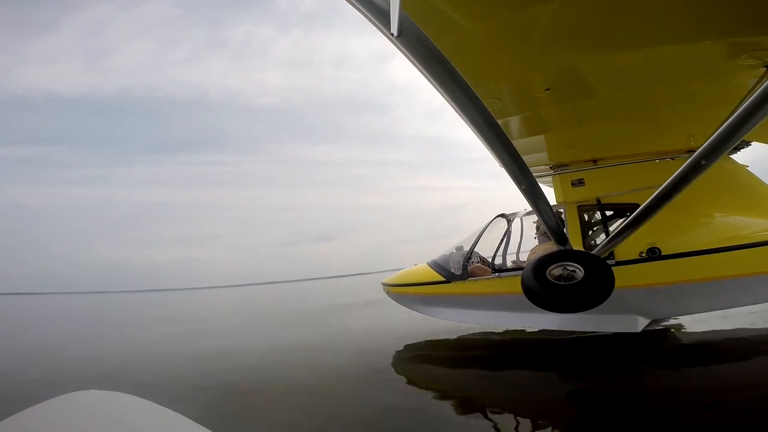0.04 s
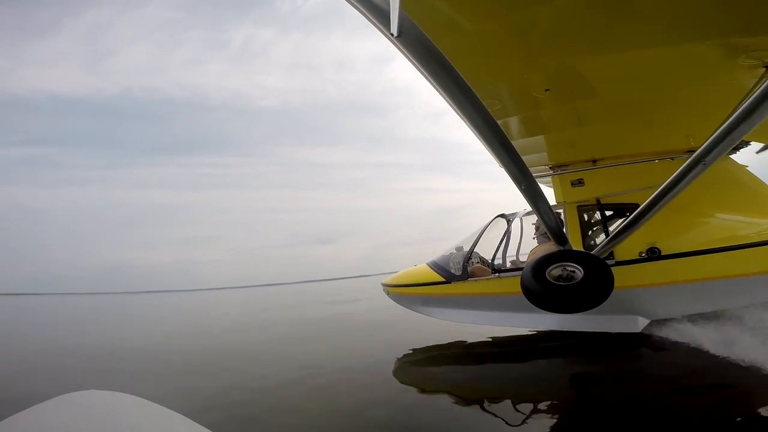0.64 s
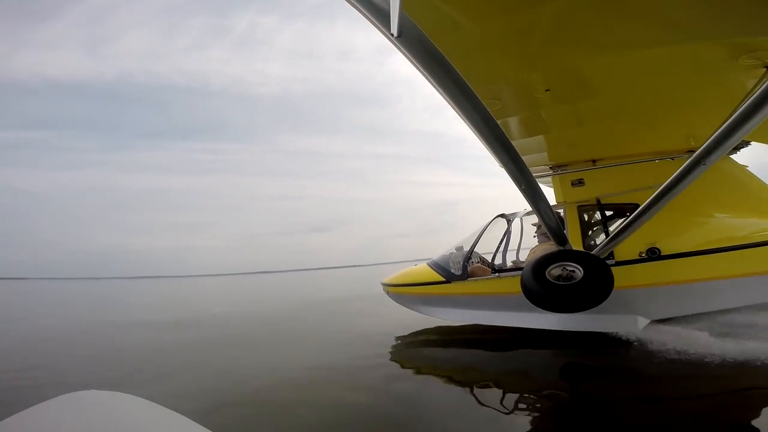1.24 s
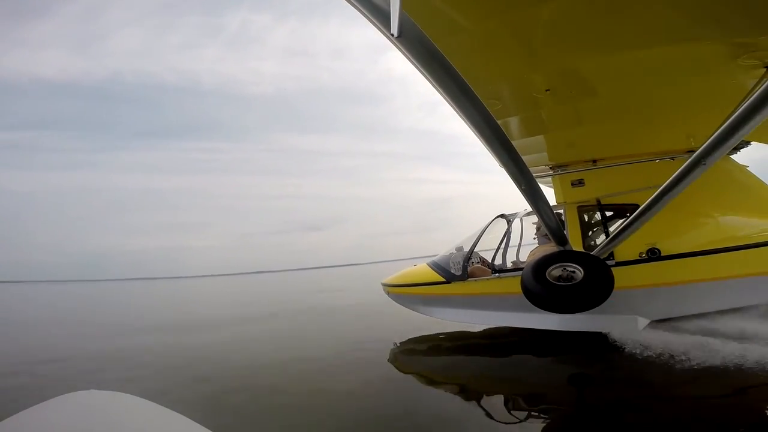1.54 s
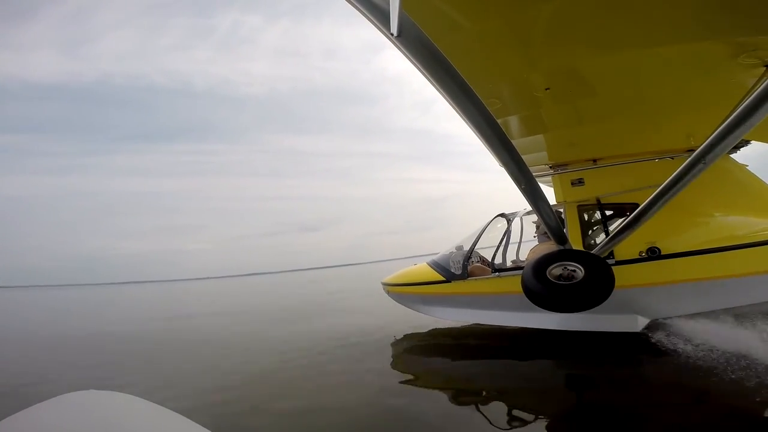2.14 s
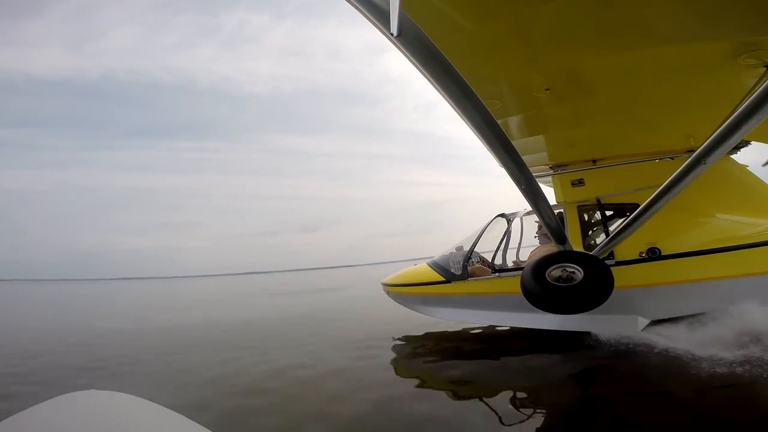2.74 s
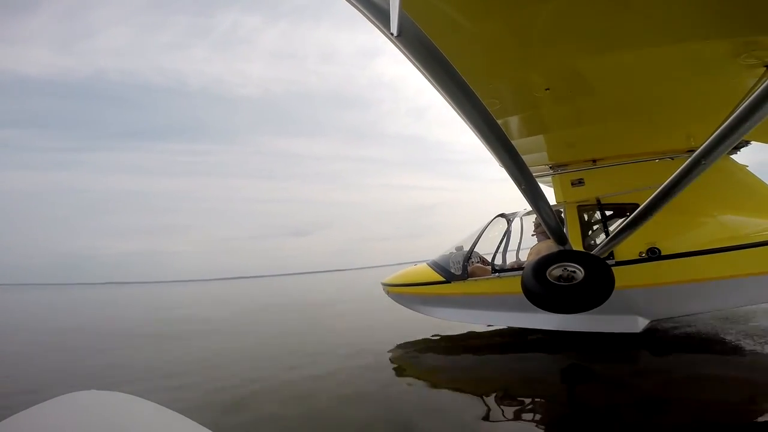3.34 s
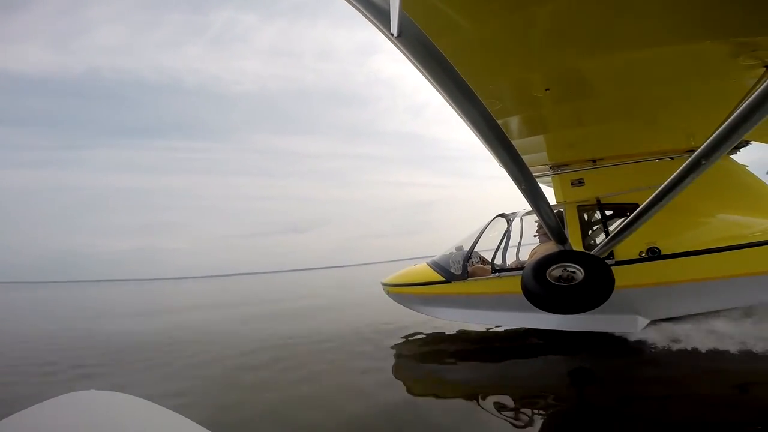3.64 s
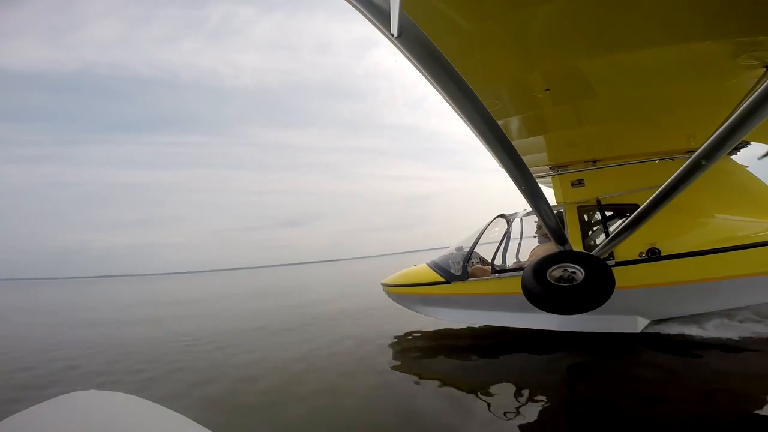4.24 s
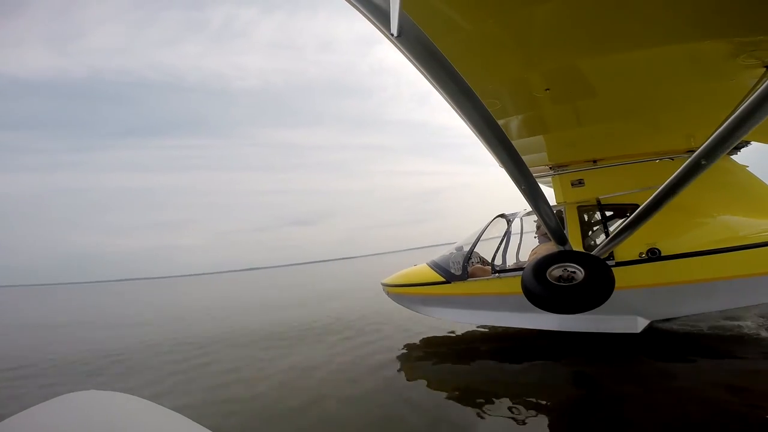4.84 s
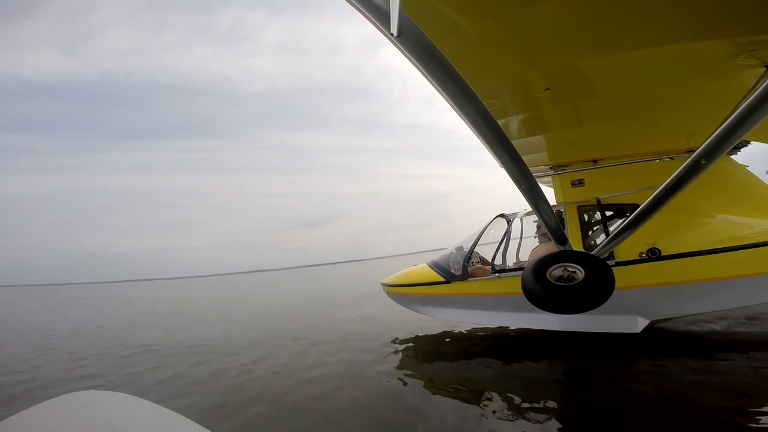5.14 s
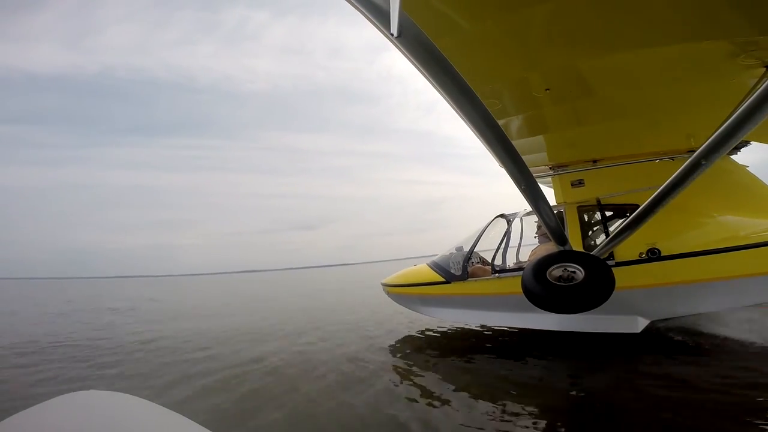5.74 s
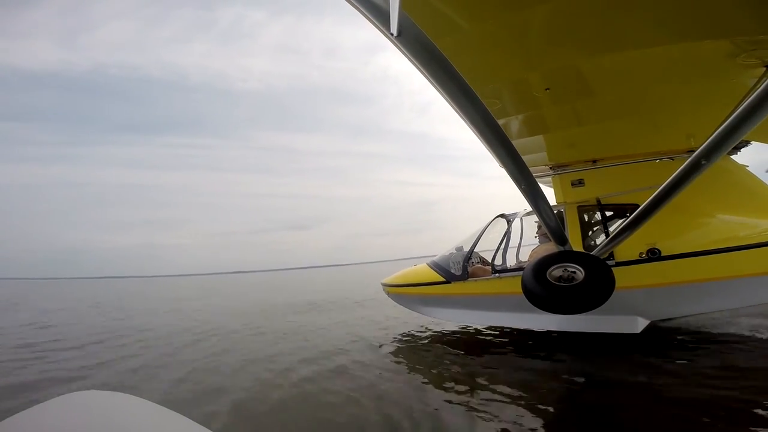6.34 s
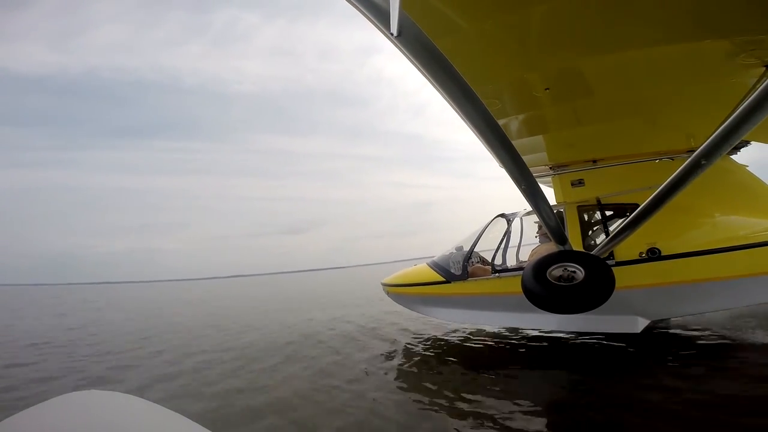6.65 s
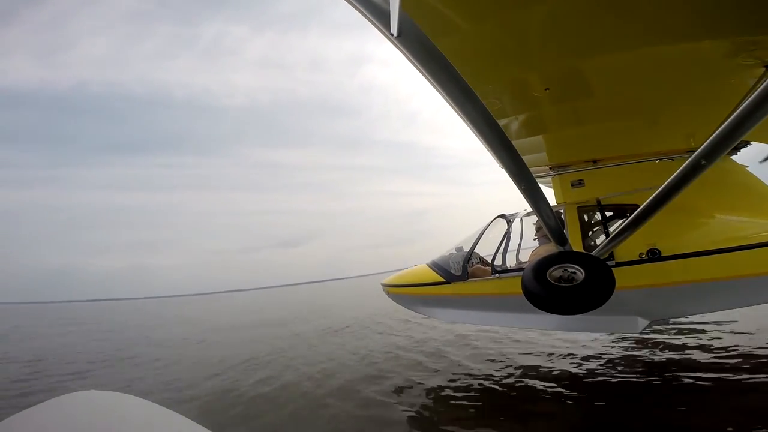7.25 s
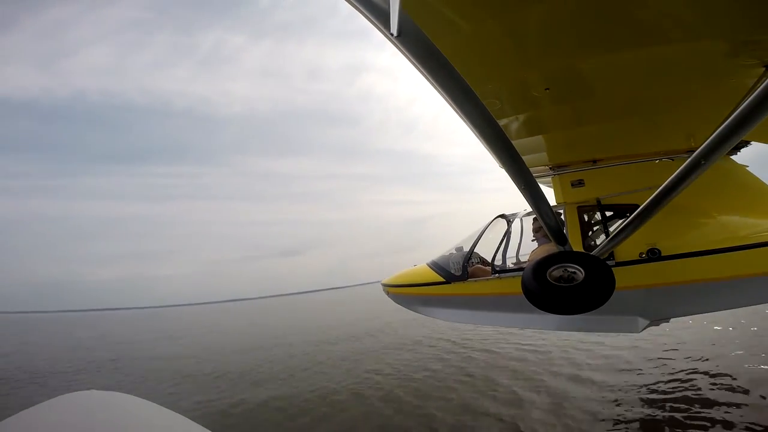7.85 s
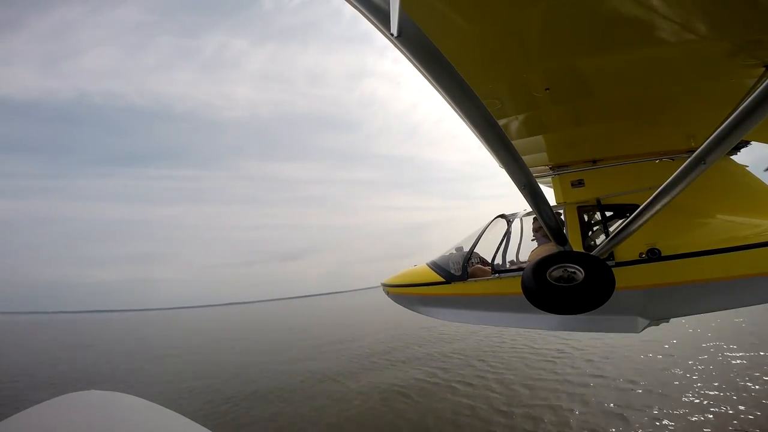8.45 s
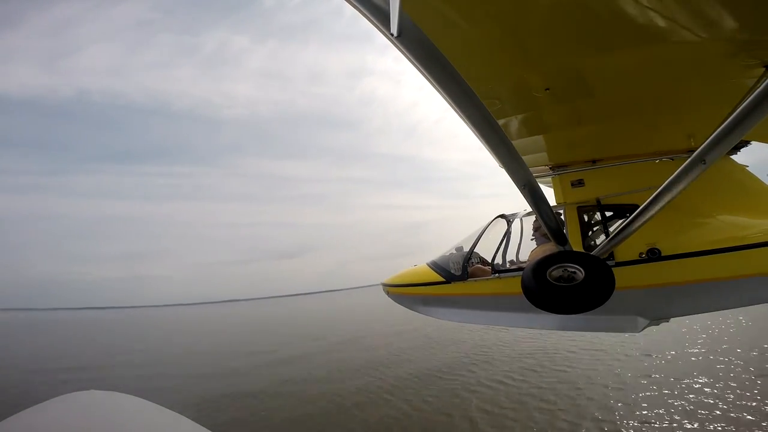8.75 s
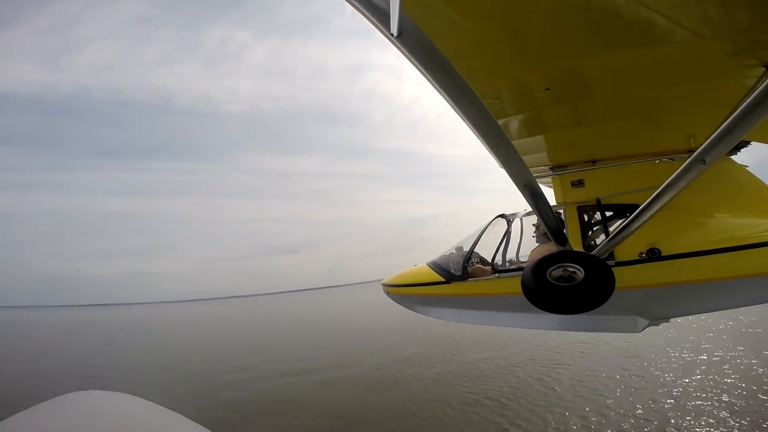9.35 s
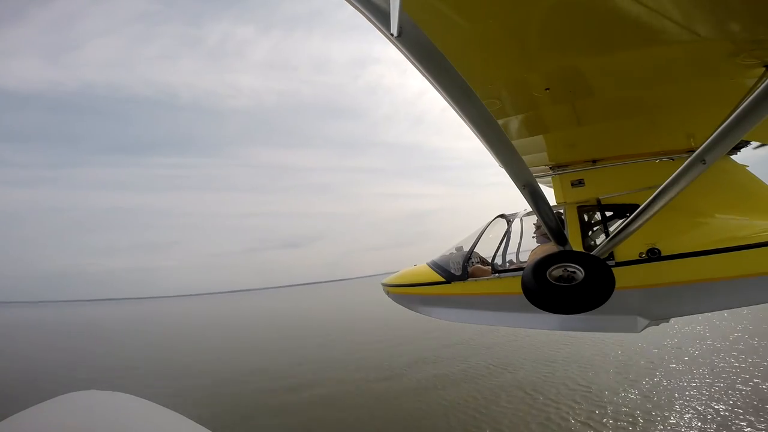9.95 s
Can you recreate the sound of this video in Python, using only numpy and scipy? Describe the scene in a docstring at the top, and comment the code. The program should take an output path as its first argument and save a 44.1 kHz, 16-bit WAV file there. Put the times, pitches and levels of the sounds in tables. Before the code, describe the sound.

A light seaplane's engine and propeller growl and climb in pitch, then hold a loud, booming drone as it skims calm water and lifts off, sagging slightly near the end. Wind buffets the wing, and a low howl swells on and off from about halfway. Air and spray hiss throughout, with faint rattles from the mount. The microphone rides on the wing, close to the engine.

```python
"""Seaplane take-off from the wing

Calm water; the microphone rides in a camera case on the wing of a light seaplane that opens its
throttle, skims and lifts off. Close by, a four-stroke engine turns a three-blade propeller through a
whining gearbox, and the low orders boom in the wing. Wind shakes the wing and a narrow resonance
howls. Right at the microphone, spray and air hiss through the case and ripples rattle its mount."""
import sys
import numpy as np
from scipy import signal
from scipy.fft import rfft, irfft, next_fast_len
from scipy.io import wavfile
from scipy.ndimage import map_coordinates

SR = 44100
rng = np.random.default_rng(int(sys.argv[2]) if len(sys.argv) > 2 else 0)


def generate_wav(sig):
    """Save sig (samples, or channels by samples) to the path in sys.argv[1] as 16-bit PCM at SR."""
    pcm = np.round(np.clip(np.atleast_2d(sig).T, -1, 1) * 32767).astype(np.int16)
    wavfile.write(sys.argv[1], SR, pcm)


N = 440559
BLADES, PINION_TEETH, WHEEL_TEETH = 3, 21, 51
BLADE_PASSES_PER_TURN = BLADES * PINION_TEETH / WHEEL_TEETH  # per turn of the crank
# how the wing carries engine and propeller to the microphone: f/Hz, gain/dB
WING_RESPONSE = [(40, -3), (62, 3), (76, 17.5), (86, 13.5), (98, 10), (113, 4), (124, 2.5), (160, -5.5),
                 (180, -4), (199, -4.5), (220, -8.5), (268, -11), (305, 7), (350, -3.5), (400, -0.5),
                 (800, -2.5), (850, 5), (915, 3.5), (965, -0.5)]


def propeller(blade_phase, rpm, full_rpm=5280, rasp_db_per_octave=28):
    """A strong blade tone, and overtones that grow with tip speed and boom in the wing."""
    # blade-passing tone at the wing: t/s, relative level/dB
    thrum_levels = [(0, -36), (.6, -23), (1.2, -35), (1.4, -13), (1.7, -9.5), (2.1, -10.5), (2.4, -22.5),
                    (2.7, -25.5), (2.9, -13), (3.7, -13), (3.9, -20.5), (4.4, -18.5), (5.1, -26),
                    (6.2, -23), (6.8, -18), (7.8, -21), (8.2, -15.5), (9.99, -18)]
    # overtones at full speed, before the wing colours them: multiple of the blade rate, level/dB
    overtones = [(2, -27.5), (3, -43.5), (4, -59), (5, -55.5), (6, -53), (7, -57.5), (8, -61), (9, -52),
                 (10, -47.5), (11, -60), (13, -45), (14, -53), (15, -48), (17, -49)]
    thrum_db, = curves(thrum_levels)
    blade_hz = rpm / 60 * BLADE_PASSES_PER_TURN
    tip_speed_db = rasp_db_per_octave * np.log2(rpm / full_rpm)
    thrum = amp(thrum_db + 0.56) * tone(blade_phase, flutter_db=1.1, drift_rad=0.034, rate=10)
    rasp = np.zeros(N)
    for order, db in overtones:
        level_db = db + along(WING_RESPONSE, order * blade_hz)
        rasp += amp(level_db) * tone(order * blade_phase, flutter_db=3.0, drift_rad=0.54, rate=14)
    return thrum + amp(tip_speed_db) * rasp


def engine(crank_phase, rpm):
    """A firing tone, and whole and half orders that swell as they cross the wing's resonances."""
    # firing tone, twice per turn of the crank: t/s, level/dB
    firing = [(0, -24), (.25, -27), (.37, -12), (.6, -14.5), (1.1, -14), (1.35, -27), (2.2, -30.5),
              (2.65, -21.5), (2.9, -31.5), (7.5, -21), (9.99, -36)]
    # exhaust and block, before the wing colours them: multiple of the crank rate, level/dB
    orders = [(1, -43), (1.5, -36), (2.5, -34.5), (3, -41.5), (3.5, -32.5), (4, -40), (4.5, -41.5),
              (5, -50.5), (5.5, -50.5), (6, -44), (7.5, -51), (8, -51), (9, -54), (10.5, -60), (11, -53),
              (13, -53), (14.5, -55.5), (15.5, -49.5)]
    # low growl as the engine labours to gain speed: t/s, gain/dB
    growl = [(0, 1.5), (.8, 3.5), (1.4, 0), (2.6, 2), (4.1, 1.5), (5.5, -2), (7, -7), (9.99, -.5)]
    # load, heard in the upper orders: t/s, gain/dB
    load = [(0, -11), (2.3, -10), (3.1, 0.5), (4.2, 1), (7.3, -3), (8.6, -0.5), (9.99, -1)]
    firing_db, = curves(firing)
    growl_db, = curves(growl)
    load_db, = curves(load)
    sound = amp(firing_db) * tone(2 * crank_phase, flutter_db=2.0, drift_rad=0.074, rate=12)
    for order, db in orders:
        effort_db = load_db if order > 3 else growl_db
        level_db = db + effort_db + along(WING_RESPONSE, order * rpm / 60)
        # uneven firing shifts the phase in proportion to the order
        partial = tone(order * crank_phase, flutter_db=1.75, drift_rad=0.051 * order, rate=18)
        sound += amp(level_db) * partial
    return sound


def resonant_howl(start_hz=176.8, rise_hz_per_s=0.98, wander_hz=2, steady_db=-12):
    """A narrow resonance of the wing or mount howls in irregular swells, creeping up in pitch."""
    howl_db = howl_envelope()
    centre_hz = start_hz + rise_hz_per_s * np.arange(N) / SR
    # the pitch is steadier when the howl is loud
    looseness = amp(np.clip(steady_db - howl_db, 0, 12))
    howl_hz = centre_hz + wander_hz * looseness * wobble(22)
    phase = 2 * np.pi * np.cumsum(howl_hz) / SR
    return amp(howl_db - 1.5) * tone(phase, flutter_db=1.0, drift_rad=0.39, rate=22)


def howl_envelope(restless_db=3.5, attack_s=0.038, release_s=0.056):
    """Level of the howl in dB: each surge swells, holds and fades over a restless bed."""
    # weak howl between surges: t/s, relative level/dB
    bed = [(0, -18), (.15, -18), (.35, -28.5), (2.2, -30), (3.3, -21), (4.2, -25), (8, -21.5), (9, -25),
           (9.99, -23)]
    # surges of the howl: start t/s, length/s, relative level/dB
    surges = [(4.028, 0.06, -12), (4.149, 0.046, -15.5), (4.273, 0.061, -13), (4.457, 0.287, -12.5),
              (4.818, 0.036, -13.5), (4.925, 0.025, -11), (4.972, 0.386, -13), (5.442, 0.053, -16.5),
              (5.502, 0.078, -12), (5.623, 0.25, -11), (5.903, 0.16, -11), (6.096, 0.49, -11),
              (6.694, 0.051, -12.5), (6.82, 0.11, -10.5), (7.031, 0.077, -12), (7.135, 0.042, -13),
              (7.188, 0.091, -11.5), (7.308, 0.264, -13.5), (7.727, 0.15, -12), (7.958, 0.055, -14.5),
              (8.018, 0.072, -12.5), (8.509, 0.06, -15.5), (9.152, 0.038, -13.5), (9.54, 0.044, -12.5),
              (9.912, 0.041, -15), (9.957, 0.041, -10)]
    t = np.arange(N) / SR
    bed_db, = curves(bed)
    level = amp(bed_db + restless_db * wobble(16))
    for start, length, db in surges:
        gate = np.minimum((t - start) / attack_s, (start + length - t) / release_s)
        level = np.maximum(level, amp(db + 0.5) * np.clip(gate + 0.5, 0, 1))
    return 20 * np.log10(level)


def wing_gusts():
    """Gusts buffet the wing under the microphone and boom in its panels."""
    # buffeting, easing as the hull leaves the water: t/s, relative level/dB
    buffet = [(0, -20), (.75, -24.5), (1.1, -33), (1.4, -25), (1.75, -35), (2.8, -32.5), (4.5, -33.5),
              (6.3, -34), (8.2, -41.5), (9.99, -36)]
    # spectrum of the buffeting: f/Hz, relative level/dB
    buffet_spectrum = [(8, -22), (14, -13), (20, 4), (27, -1.5), (34, -7), (48, -0.5), (58, -23), (90, -27),
                       (300, -85)]
    # wind-driven boom: t/s, level/dB
    boom = [(0, -25.5), (1.1, -22), (1.4, -16.5), (1.8, -26.5), (2.4, -19.5), (6.2, -23), (7.4, -27),
            (9, -20.5), (9.99, -19)]
    # wing panel modes: f/Hz, width/Hz, relative level/dB
    panels = [(77.9, 12.4, 2.5), (101, 44, -10), (121, 39, -13.5), (170, 24, -16), (198, 9, -9.5),
              (247, 33, -15.5), (287.7, 37, -11.5), (316, 17, -17.5), (388.5, 34, -22.5), (514, 48, -29.5),
              (670, 84, -31.5)]
    buffet_db, = curves(buffet)
    boom_db, = curves(boom)
    return amp(buffet_db + 0.5) * rush(buffet_spectrum) + amp(boom_db) * resonant(panels)


def spray(spray_db, flicker_db=0.6):
    """Water spray makes a broad, slightly flickering hiss."""
    # spray as heard in the case: f/Hz, relative level/dB
    spectrum = [(150, -15), (350, -2.5), (500, 0), (800, -5), (1100, -2.5), (2200, -0.5), (3800, -14.5),
                (5500, -7.5), (6500, -13), (8200, -20), (10200, -18.5), (12000, -24.5), (13700, -31),
                (15300, -33)]
    return amp(spray_db + 16.5 + flicker_db * wobble(25)) * rush(spectrum)


def slipstream(blade_phase, air_db, chop_depth=0.062):
    """Air chopped by the blades hisses in the case around the microphone."""
    # air resonances of the case: f/Hz, width/Hz, relative level/dB
    case_modes = [(1841, 200, -1), (2295, 310, -6.5), (2767, 310, -5), (3011, 193, 0.7), (3539, 390, 0),
                  (4000, 600, -10), (4603, 240, -12)]
    # upper resonances, woken by faster air: f/Hz, width/Hz, relative level/dB
    sizzle_modes = [(5360, 120, -4), (5950, 260, -2.5), (6970, 300, -3.5), (7266, 430, 0), (7710, 380, -11),
                    (8740, 600, -21), (10200, 370, -22.5)]
    # sizzle as airspeed builds: t/s, gain/dB
    sizzle_gain = [(0, -11.5), (4, -10.5), (9.99, -7.5)]
    sizzle_db, = curves(sizzle_gain)
    case = resonant(case_modes) + amp(sizzle_db) * resonant(sizzle_modes)
    hiss = amp(air_db + 0.25 + 0.71 * wobble(30)) * case
    return hiss * (1 + chop_depth * np.cos(blade_phase))


def mount_rattle(spray_db, swell_s=0.0046):
    """The case's mount buzzes along with the spray; bigger ripples shake it into brief chatters."""
    # ring of the mount: f/Hz, width/Hz, relative level/dB
    buzz_modes = [(1116, 76, -9), (1447, 230, -2), (1480, 58, 1), (1710, 210, -7.5)]
    # its ring when it shakes loose: f/Hz, width/Hz, relative level/dB
    chatter_modes = [(1146, 126, -5.5), (1500, 91, 1), (1850, 300, -11)]
    # chatters: t/s, relative peak level/dB
    chatters = [(0.074, -14), (0.163, -14.5), (0.4334, -19), (0.5986, -13.5), (0.9123, -18), (1.1363, -14),
                (1.249, -14), (1.296, -19), (1.3853, -13), (1.4207, -12), (1.674, -14), (1.7749, -19.5),
                (1.8946, -16), (1.973, -18), (2.0617, -17), (2.2524, -19), (2.3391, -19), (2.655, -13),
                (3.4675, -17), (3.927, -18), (4.8998, -15), (5.205, -16), (5.771, -14.5), (6.3634, -18),
                (6.419, -15)]
    buzz = amp(spray_db + 14 + 1.55 * wobble(45)) * resonant(buzz_modes)
    t = np.arange(SR // 10) / SR
    burst = (t / swell_s) ** 2 * np.exp(2 * (1 - t / swell_s))
    shake = np.zeros(N)
    for start, db in chatters:
        shake[round(start * SR):][:len(t)] += amp(db - 9.0) * burst
    return buzz + shake * resonant(chatter_modes)


def float_slap():
    """Down at the waterline, a wavelet knocks on the hollow float."""
    # one hard slap: t/s, relative peak level/dB
    slaps = [(0.187, -9.5)]
    # modes of the float: f/Hz, width/Hz, relative level/dB
    float_modes = [(176, 85, 9.5), (410, 130, 0), (626, 79, -3), (1140, 120, -5), (1540, 180, -6)]
    blows = np.zeros(N)
    for start, db in slaps:
        blows[round(start * SR)] = amp(db + 3.5)
    return signal.fftconvolve(blows, ring(float_modes))[:N]


def gearbox(crank_phase):
    """A faint gear whine swells as its rising pitch passes a resonance, then fades."""
    # gear mesh whine: t/s, level/dB
    whine = [(0, -59), (3.1, -47), (3.45, -49), (3.7, -38), (4.1, -40), (4.5, -47), (10, -73)]
    whine_db, = curves(whine)
    return amp(whine_db) * tone(PINION_TEETH * crank_phase, flutter_db=4.5, drift_rad=0.95, rate=34)


def hiss_levels(dip_half_width_s=0.043):
    """Levels in dB of the spray and air hiss as heard, ducking briefly when the low sounds surge."""
    # hiss at the microphone: t/s, relative spray level/dB, relative air level/dB
    levels = [(0, -53, -23.5), (.18, -50, -24.5), (.24, -54.5, -26.5), (.9, -53.5, -28.5), (1.4, -50, -26),
              (1.8, -54, -32), (2.25, -55, -32.5), (2.7, -48, -27.5), (2.95, -48, -27), (3.2, -50, -31),
              (3.7, -48.5, -30), (4.05, -46.5, -27.5), (4.6, -48.5, -29.5), (5.1, -47, -27.5),
              (6.6, -50, -29.5), (7.6, -51, -30), (8.4, -51.5, -27), (9.99, -49, -24.5)]
    # brief dips under the late surges of the howl: t/s, depth/dB
    dips = [(6.519, 3.5), (6.91, 4), (7.26, 3.5), (7.45, 3.8), (7.81, 4.8)]
    t = np.arange(N) / SR
    dip_db = sum(db * np.exp(-((t - centre) / dip_half_width_s) ** 2) for centre, db in dips)
    return curves(levels) - dip_db


def amp(db):
    """Decibels to gain."""
    return 10 ** (np.asarray(db) / 20)


def unit(x):
    """Scale to rms 1."""
    return x / np.sqrt(np.mean(x ** 2) + 1e-20)


def along(points, hz):
    """Read (f/Hz, value) points at hz, on a log frequency axis."""
    freqs, values = np.transpose(points)
    return np.interp(np.log(hz + 1), np.log(freqs + 1), values)


def curves(rows):
    """One value per sample for each column after the time."""
    times, *columns = np.transpose(rows)
    return [np.interp(np.arange(N) / SR, times, column) for column in columns]


def wobble(rate):
    """A smooth random curve, rate knots a second."""
    coarse = np.arange(0, N + 32, 32)
    knots = rng.standard_normal(int(N * rate / SR) + 4)
    return np.interp(np.arange(N), coarse, map_coordinates(knots, [coarse * rate / SR]))


def filtered(x, response):
    """Filter x by a gain given as a function of frequency."""
    size = next_fast_len(N + 8192)
    return irfft(rfft(x, size) * response(np.fft.rfftfreq(size, 1 / SR)), size)[:N]


def rush(spectrum):
    """Noise of rms 1 with a (f/Hz, level/dB) spectrum."""
    return unit(filtered(rng.standard_normal(N), lambda hz: amp(along(spectrum, hz))))


def resonant(modes):
    """Noise of rms 1 in steep-sided resonances."""
    def response(hz):
        power = sum(amp(db) ** 2 / (1 + ((hz - f) / width) ** 2) ** 4 for f, width, db in modes)
        return np.sqrt(power)
    return unit(filtered(rng.standard_normal(N), response))


def ring(modes):
    """The answer of damped modes to one blow, peak 1."""
    t = np.arange(SR // 10) / SR
    wave = sum(amp(db) * np.exp(-np.pi * width * t) * np.sin(2 * np.pi * hz * t)
               for hz, width, db in modes)
    return wave / np.abs(wave).max()


def tone(phase, flutter_db, drift_rad, rate):
    """A sine of rms near 1 whose level and phase waver at random, rate times a second."""
    start = rng.uniform(0, 2 * np.pi)
    level = np.sqrt(2) * amp(flutter_db * wobble(rate))
    return level * np.sin(phase + start + drift_rad * wobble(rate))


def scene():
    """Mono, on the wing: one crankshaft drives engine, gears and propeller amid wind and water."""
    # crankshaft speed: t/s, speed/rpm
    crank_speed = [(0, 2234), (.3, 2332), (.8, 3070), (1.2, 3449), (2.2, 3837), (2.8, 4350), (3.4, 4799),
                   (3.9, 5015), (4.6, 5148), (5.4, 5240), (6.3, 5282), (8.1, 5310), (8.9, 5100),
                   (9.4, 5022), (9.99, 4974)]
    rpm, = curves(crank_speed)
    spray_db, air_db = hiss_levels()
    crank_phase = 2 * np.pi * np.cumsum(rpm / 60) / SR
    blade_phase = crank_phase * BLADE_PASSES_PER_TURN
    drive = engine(crank_phase, rpm) + propeller(blade_phase, rpm) + gearbox(crank_phase)
    wing = resonant_howl() + wing_gusts()
    hiss = spray(spray_db) + slipstream(blade_phase, air_db)
    return (drive + wing + hiss + mount_rattle(spray_db) + float_slap())[None]


def record(dry, top_hz=15290):
    """The camera keeps nothing above its band limit."""
    return filtered(dry[0], lambda hz: hz < top_hz)[None]


dry = scene()
out = record(dry)
generate_wav(out)
```